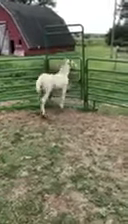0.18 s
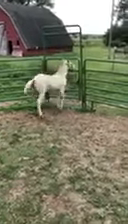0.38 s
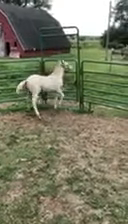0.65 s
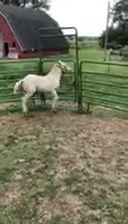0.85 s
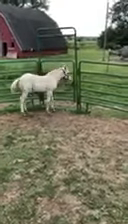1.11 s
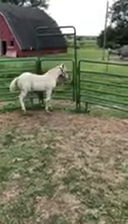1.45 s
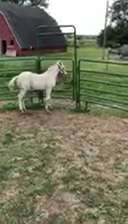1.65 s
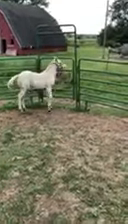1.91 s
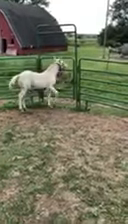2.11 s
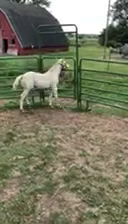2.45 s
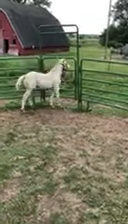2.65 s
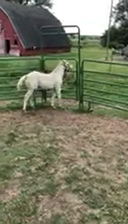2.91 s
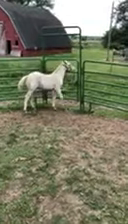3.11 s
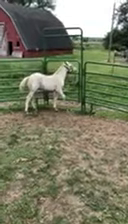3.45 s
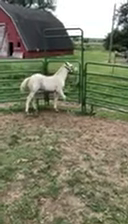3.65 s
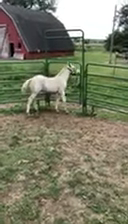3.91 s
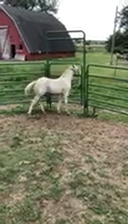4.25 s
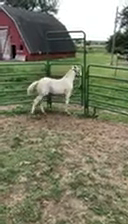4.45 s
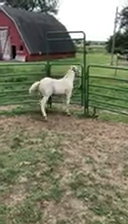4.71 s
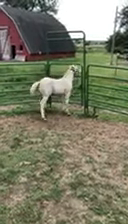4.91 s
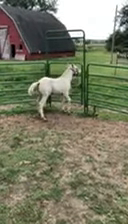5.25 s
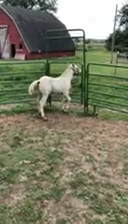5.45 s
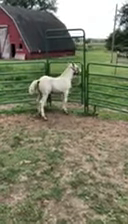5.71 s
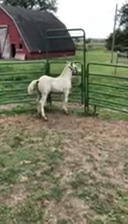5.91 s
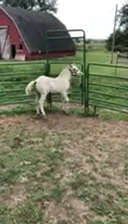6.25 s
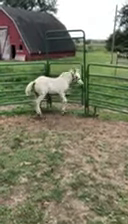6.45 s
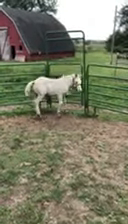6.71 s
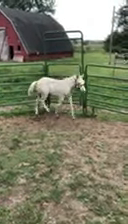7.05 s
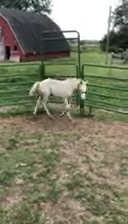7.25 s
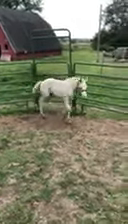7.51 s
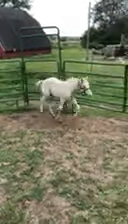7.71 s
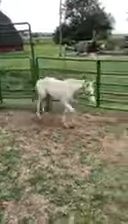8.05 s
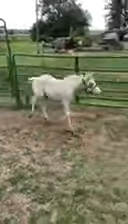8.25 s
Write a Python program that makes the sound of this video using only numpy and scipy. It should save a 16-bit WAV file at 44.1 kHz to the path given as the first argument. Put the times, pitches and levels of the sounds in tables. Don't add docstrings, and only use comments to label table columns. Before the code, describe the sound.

A farmyard outdoors, microphone some metres from a steel pipe corral. Crickets chirr throughout in rapid falling pulses with a thin high insect hiss, over low, gusting wind and distant traffic rumble. At 0 s a hard clank is already ringing, bright and hollow, fading over about a second; a soft hoof step comes at 0.2 and faint rail nudges until 0.9, with dry grass snaps. At 2.2 a second sharp clank with a short shake, chain links tinkling until 3.0. At 3.8 a light knock, then a strong clank at 4.03. From 4.5 to 5.8 the loose gate bounces and rattles, chain and latch chattering, strongest at 4.7 and 5.0. At 5.9 a last clear clank rings, with duller shudders and taps thinning until 7.6. From 7.7 hooves thud on dirt, heaviest near 8.0, with a crisp grass snap at 8.1 and a final step at 8.3.

```python
import sys
import numpy as np
from scipy import signal
from scipy.fft import rfft, irfft, next_fast_len
from scipy.io import wavfile
from scipy.ndimage import uniform_filter1d, minimum_filter1d, map_coordinates

SR = 44100
rng = np.random.default_rng(int(sys.argv[2]) if len(sys.argv) > 2 else 0)


def gain_from_db(level_db):
    decades = np.asarray(level_db, float) / 20
    return 10 ** decades


def inscribe(sig):
    pcm = np.round(np.clip(np.atleast_2d(sig).T, -1, 1) * 32767)
    wavfile.write(sys.argv[1], SR, pcm.astype(np.int16))


N = 369099

# frequency in Hz, level in dB per Hz.
WASH_SPECTRUM = [(15, -43.5), (25, -13), (70, -2), (346, -12), (737, -15.5), (1860, -20), (2020, -19.5),
                 (2550, -21.5), (3800, -23.5), (4940, -39.5), (8360, -120)]
RUMBLE_SPECTRUM = [(20, -16.0), (60, -1.0), (120, 1.0), (250, -26.0), (400, -48.0)]
# peak time in seconds, rise over the lull in dB.
GUST_PEAKS = [
    (0, 4),
    (1.9, 5.5),
    (3.7, 2),
    (4.7, 10),
    (5.9, 9),
    (6.5, 5),
    (7.6, 11),
    (8.3, 6),
]
LULL_DB, GUST_S = -80, 0.52

# pulses per second, start pitch in Hz, level in dB.
NEAR_CRICKETS = [(22.33, 5300, 0.5), (23.8, 5000, 0), (30.65, 4750, -7), (21.93, 5150, -4),
                 (21.02, 4800, -1), (25.4, 4600, -6.5), (27.76, 5350, -3.5)]
# frequency in Hz, level in dB per Hz.
CHORUS_SPECTRUM = [(3500, -27), (4000, -4), (4500, 7.5), (5000, 8), (5300, -3.5), (5600, -71)]
HISS_SPECTRUM = [(5000, -55.5), (6300, -33.5), (6800, -9.5), (7400, -6.5), (7650, 6), (8200, 5),
                 (8950, 1.5), (9200, -14), (9800, -20.5), (10300, -22), (11000, -58)]
# start in seconds, level in dB, pitch in Hz, length in seconds, sag in Hz per s.
INSECT_NOTES = [
    (7.259, -51.5, 6450, 0.021, 1300),
    (6.15, -63, 7960, 2.4, -0.5),
    (3.3, -67, 8066, 0.83, 0),
]
CRICKET_DB, FAR_CRICKET_DB, HISS_DB = -62, -63.5, -59

# time in seconds, peak in dB, grit in dB, ground pitch in Hz.
HOOF_FALLS = [
    (0.197, -48, -1.5, 116),
    (4.205, -51.5, -8, 92),
    (4.347, -53, -4, 106),
    (4.652, -46.5, -19, 96),
    (7.725, -45, -9, 107),
    (7.837, -59, 4.5, 119),
    (7.968, -40, -10, 91.6),
    (7.995, -50, 3, 102),
    (8.02, -51, -12, 100),
    (8.304, -44, -3, 86),
]
# time in seconds, peak in dB, length in seconds.
GRASS_SNAPS = [(0.799, -45.5, 0.038), (0.831, -43, 0.0045), (0.834, -46.5, 0.044), (1.248, -41.5, 0.016),
               (1.723, -48, 0.013), (7.392, -46.5, 0.019), (7.696, -40.5, 0.029), (7.728, -44.5, 0.019),
               (7.987, -45.5, 0.031), (8.136, -31.5, 0.0076), (8.143, -40, 0.024), (8.297, -53, 0.021)]
# frequency in Hz, level in dB per Hz.
GRIT_SPECTRUM = [(200, 1.0), (500, -4.0), (1500, -7.5), (3200, -10.0), (4500, -18.0), (9000, -25.5)]
SNAP_SPECTRUM = [(2000, -32), (3000, -26), (5000, -30), (6400, -27.5), (7600, -5), (8190, 3.5), (9500, -15),
                 (10300, -48)]
THUD_T60_S, THUD_SHORTENS = 0.081, 3.3

# frequency in Hz, t60 in seconds.
YARD_T60 = [(300, 1), (2000, 0.64), (9000, 0.08)]

# mode frequency in Hz, level in dB.
FRAME_MODES = [(250, -19.5), (400, -12.5), (800, -2), (1200, -2), (1600, 1.5), (1900, -8), (2600, -8),
               (4000, -26.5)]
CHAIN_MODES = [(1200, -16.5), (2000, -8), (2800, -4.5), (3600, -4), (4500, -6.5), (5500, -17), (6500, -20),
               (8500, -11.5), (10000, -33)]
LINK_MODES = [(6500, -36), (7500, -2), (8000, 13), (8800, 8.5), (9600, -7), (10200, -33)]
# time in seconds, peak in dB, bright part in dB.
GATE_BOUNCES = [(4.56, -41.5, 17.5), (4.572, -45, 11), (4.581, -41.5, 8), (4.624, -41, 3),
                (4.704, -32.5, -4), (4.727, -37, -2), (4.735, -42, -9), (4.751, -48, -8),
                (4.824, -40.5, -11), (4.845, -37, 6), (4.884, -40, -11), (4.997, -32.5, -4),
                (5.039, -41.5, -15), (5.134, -40, -20), (5.289, -51.5, -2), (5.375, -46.5, -4),
                (5.562, -44.5, -28), (5.646, -43.5, -15), (5.702, -39, -27), (5.833, -47.5, -28),
                (6.392, -46, -16), (6.74, -63, 1), (7.109, -60, -19), (7.15, -48, -23), (7.341, -47.5, -3),
                (5.423, -60, -8), (5.617, -54, -15), (6.518, -55, -15.5), (6.957, -65, -12),
                (7.228, -60, -9), (7.433, -59, -4), (7.476, -60, -10)]
GATE_SHUDDERS = [(4.623, -39, -4.5), (4.809, -38, -17), (4.866, -43.5, -12), (5.529, -47.5, -20),
                 (6.125, -42, -39), (6.281, -42.5, -14), (6.483, -53, -28), (6.582, -50.5, -11),
                 (6.692, -50, -11), (7.561, -62.5, -2), (7.59, -63, 3.5)]
BOUNCE_T60_S, SHUDDER_T60_S = .17, .4
# time in seconds, level in dB.
LINK_TINKLES = [
    (2.263, -47),
    (2.917, -51),
    (2.95, -51.5),
    (2.999, -56),
    (6.068, -55.5),
]
SMALL_LINK_TINKLES = [
    (2.423, -45.5),
    (2.433, -49),
]
LINK_T60_S, SMALL_LINK_T60_S = 0.64, 0.29
# start in seconds, hold in seconds, level in dB, bright part in dB.
PANEL_SHAKES = [
    (2.23, 0.21, -58, 10),
    (4.516, 0.51, -45.5, -6),
    (5.479, 0.22, -59, -8),
    (6.048, 0.64, -58, -17),
    (7.09, 0.96, -67.5, -13),
]
SHAKE_RISE_S, SHAKE_FALL_DB_PER_S = 0.033, 53
GRIND_BRIGHT_TOP = [(5500, -35)]

# frequency in Hz, level in dB, t60 in seconds.
LATCH_MODES = [(786, -9.5, 0.074), (946, -16, 0.14), (1287, -9.5, 0.18), (1540, 2, 0.058),
               (1670, -2, 0.085), (2235, -12, 0.15), (2640, -11, 0.075), (3090, -12, 0.044),
               (3680, -11.5, 0.1), (3950, -13, 0.071), (4800, -13, .05), (6300, -24.5, 0.14)]
# time in seconds, level in dB, tilt in dB per octave.
LATCH_TAPS = [(4.038, -58, 14), (4.705, -40, 7), (4.8457, -45, 2), (4.868, -41, 1), (4.997, -45, 3.5),
              (5.136, -44.5, -9), (5.147, -50, -4), (5.157, -51, -7), (5.53, -54, -3), (5.564, -58, -6),
              (5.704, -45, -8.5), (5.738, -54, -8), (5.837, -67, -2), (6.127, -50, -6), (6.218, -51.5, -8),
              (6.264, -50, -7), (6.482, -59, -3), (6.582, -56, -3), (6.692, -51, -5), (6.739, -53.5, -3),
              (7.11, -56, -2), (7.148, -57.5, -5), (7.339, -49.5, -1), (7.485, -63, 0)]
# frequency in Hz, level in dB, t60 in seconds.
LOOSE_RAIL_MODES = [(948, -5.5, 0.52), (1170, -8.5, 0.36), (1360, -11, 0.4), (1440, -11, 0.43),
                    (1715, -1.5, 0.82), (1845, -1.5, 0.7), (2260, 1.5, 0.98), (2494, -9, 0.66),
                    (2602, -10, 0.69), (2819, -14, 0.76), (2960, -14.5, 0.79), (3250, -14, 0.23),
                    (3640, -16, .4)]
SAG_RAIL_MODES = [(1740, -2, .9), (1760, 0, 1.9), (1846, -6, .9), (1880, -8, 1), (2013, -8, .9),
                  (2446, -10, .6), (2820, -4, 0.6), (3540, -5, .4), (4057, -10, .4)]
FOOT_RAIL_MODES = [(1190, -8, 1), (1536, -3, .8), (1704, 0.5, 1.6), (1844, -9, 1.6)]
# time in seconds, level in dB, tilt in dB per octave.
RAIL_NUDGES = [
    (.333, -58, -1),
    (.61, -61.5, -4),
    (.632, -60, 2.5),
    (.764, -70, 8),
    (2.72, -67, 1),
    (3.818, -65, -13),
    (5.929, -61, -11),
]
RAIL_PRESSES = [
    (3.821, -59, 3),
]
RAIL_RUBS = [
    (6.28, -57.5, -3),
    (6.4, -58, 2),
]

# t60 in seconds, level in dB struck at each of four spots.
PANEL_MODES = [(0.5, -57, -57, -63, -55), (0.5, -54, -51, -60, -56), (1.8, -48, -46, -62, -61),
               (.8, -47, -44, -56, -74), (1.5, -48, -51, -59, -53), (4.8, -63, -67, -60, -51),
               (1.45, -39.5, -50, -60, -60), (.9, -60, -44, -62, -49), (2.4, -56, -55, -50, -48),
               (1.03, -58, -51, -57, -57), (0.95, -54, -44, -60, -52), (1.15, -53, -54, -54, -50),
               (1.15, -42.5, -43.5, -52.5, -56), (1.1, -48, -43, -62, -52.5),
                  (2.17, -57.5, -54, -66, -64), (0.73, -48, -51, -59.5, -64), (0.7, -55, -49, -51, -63),
                  (0.81, -48.5, -48, -52, -63), (0.65, -49.5, -40, -64, -52), (0.71, -62, -49, -65, -55),
                  (0.49, -54, -37, -55, -44), (0.9, -86, -58, -62, -75), (1.1, -54.5, -45.5, -66, -72),
                  (0.51, -62, -42.5, -65, -55),
               (0.26, -53, -71, -59, -72), (0.48, -57, -42, -80.5, -51), (0.45, -85, -44, -56, -64),
              (0.48, -48, -28, -49, -45.5), (0.52, -49.5, -44, -72, -79), (0.6, -55, -56, -73, -55),
               (0.3, -56, -55, -66, -39.5), (0.24, -43, -42, -73, -59), (0.29, -77, -51, -65, -50),
                 (0.85, -56, -44, -63, -43.5), (0.67, -50, -43, -67, -60), (0.56, -41.5, -39, -68, -54),
                 (0.3, -60, -46, -42.5, -59), (0.49, -83, -42, -46, -58), (0.59, -76, -34.5, -48, -58),
                 (0.6, -59, -36, -43.5, -54.5), (0.62, -51, -41, -54, -53), (0.56, -64, -44, -51, -43),
               (0.72, -50.5, -43, -59, -42), (0.46, -39.5, -36, -57, -37.5), (0.49, -58, -47, -56, -70),
               (0.31, -60, -42, -45, -78), (0.4, -57, -34, -51, -60), (0.63, -51, -39, -49.5, -54),
               (0.39, -44, -46.5, -52, -59), (0.73, -67, -49.5, -72, -81),
               (0.76, -79, -57, -62, -60), (0.19, -48, -51, -46, -48), (0.36, -56.5, -55, -47, -74),
             (1.5, -61.5, -57, -63, -60), (1.4, -74, -69.5, -70, -62), (0.56, -79, -70, -72, -75),
             (1.7, -70, -59.5, -68, -76), (1.41, -74, -75, -61.5, -61), (5, -69, -59, -73, -79),
             (1.6, -63, -62, -68, -65),
               (1.5, -52, -52, -67, -74), (1.8, -54, -50.5, -73, -76), (0.64, -48, -73, -70, -78),
                    (0.81, -52, -60, -66, -75), (0.33, -70, -60, -70, -45.5),
                    (0.76, -53.5, -39, -56, -54.5), (0.64, -71, -49.5, -61, -50), (.6, -74, -60, -71, -53),
                    (0.76, -70, -42, -71, -45), (.7, -49, -40, -59, -65), (.5, -43, -61, -65, -70),
                    (.5, -43, -60, -70, -67), (0.46, -60, -52, -43.5, -62), (0.54, -65, -51, -58, -74)]
PANEL_MODE_HZ = [
    [949, 1359, 1711.5, 1729, 1756.2, 1758.5, 1775, 1843, 1865, 1890, 2013, 2032],
    [2260, 2390, 2410, 2552, 2584, 2608, 2748, 2853, 2884, 3035, 3203, 3232],
    [3338, 3381, 3494, 3588, 4007, 4042],
    [4091, 4118, 4175, 4837, 4880, 4949, 5002, 5095, 5110, 5214, 5238, 5335],
    [5374, 5551, 5747, 5915, 5992, 6015, 6266, 6325],
    [7157, 7562, 7932, 7960, 8066, 8176, 8460, 8481, 8613, 8808],
    [1694, 1986, 2244, 2622, 4074, 4785, 4813, 4860, 4897, 4927, 5021, 5358, 5542, 5767],
]
# time in seconds, ring in dB, crash in dB, tilt in dB per octave.
SPOT_BLOWS = [
    [(-.004, 1, -40, 2), (.435, -36, -67, 0), (.915, -34, -69, -5), (0.335, -40, -68, -18),
     (.61, -33, -67, 0)],
    [(2.2175, 2, -33.5, -1), (2.262, -55, -47.5, 5), (2.718, -26, -58.5, -5.5), (4.562, -23, -40.5, 1),
     (4.705, -19, -45.5, -8)],
    [(3.815, -25, -55.5, -2), (3.826, -10, -53.5, -6), (4.028, -19, -52, 1.5), (4.033, 1, -43, 1.5),
     (4.53, -18, -59, -6)],
    [(5.916, 1, -41.5, 1.5), (8.1, -43, -89, 6)],
]
# frequency in Hz, level in dB per Hz.
CROWD_SPECTRUM = [(210, -70), (350, -28.5), (926, -22.5), (1230, -17.5), (1750, -11), (2900, -4),
                  (3490, -4), (4300, -6), (5110, -28.5), (10200, -39), (13200, -59), (22000, -120)]
CRACK_SPECTRUM = [(400, -39.0), (2000, -2.5), (5000, -1.0), (6700, -6.5), (8500, -0.5), (10500, -17.0)]
SHIMMER_SPECTRUM = [(3500, -15.0), (4200, -19.0), (5000, -3.0), (5500, -16.5), (7000, -28.5),
                    (8000, -27.0), (9500, -6.5), (11000, -60)]
HARD_RISE_S, SOFT_RISE_S, SOFT_BELOW_DB, SOFT_SPAN_DB = .0007, .016, -53, 3
SOFT_CROWD_DB, CROWD_T60_S = -3, .3
SHIMMER_DB, SHIMMER_T60_S, SHIMMER_RISE_S = -20, 1.1, .05

# frequency in Hz, level in dB per bin.
SPECTRUM_FLOOR = [(100, -71), (1800, -38.5), (3500, -43.5), (5300, -57), (5500, -38), (6300, -58),
                  (6450, -56.5), (11000, -47.5)]
# centre in Hz, half width in Hz, extra masking in dB.
MASKED_BANDS = [(2140, 65, 4), (3100, 60, 9), (3400, 50, 9), (3800, 110, 10), (4330, 130, 11)]
TOP_HZ = 10250


def unit(x):
    return x / np.sqrt(np.mean(x ** 2) + 1e-20)


def along(points, hz):
    f, v = np.transpose(points)
    return np.interp(np.log(hz + 1), np.log(f + 1), v)


def wobble(rate_hz):
    at = np.arange(0, N + 32, 32)
    knots = rng.standard_normal(int(N * rate_hz / SR) + 4)
    return np.interp(np.arange(N), at, map_coordinates(knots, [at * rate_hz / SR]))


def filtered(x, response):
    m = next_fast_len(N + SR // 2)
    return irfft(rfft(x, m) * response(np.fft.rfftfreq(m, 1 / SR)), m)[:N]


def noise(spectrum):
    return unit(filtered(rng.standard_normal(N), lambda hz: gain_from_db(along(spectrum, hz))))


def add(track, start_s, sound):
    i = round(start_s * SR)
    part = track[max(i, 0):max(i + len(sound), 0)]
    part += sound[max(-i, 0):][:len(part)]


def fall(t, t60_s, rise_s):
    return (1 - np.exp(-t / rise_s)) * gain_from_db(-60 * t / t60_s)


def contact_s(crash_db):
    hardness = np.exp((crash_db - SOFT_BELOW_DB) / SOFT_SPAN_DB)
    return HARD_RISE_S + (SOFT_RISE_S - HARD_RISE_S) / (3 + hardness)


def clatter(spectrum, lo_hz, hi_hz, contacts, count, rise_s=0.00056):
    out, t = np.zeros(N), np.arange(SR // 3) / SR
    hz = np.geomspace(lo_hz, hi_hz, count) * (1 + .008 * rng.standard_normal(count))
    tones = np.sin(2 * np.pi * (hz[:, None] * t + rng.random((count, 1))))
    chance = rng.standard_normal((len(contacts), count + 8))
    rises_s = np.broadcast_to(rise_s, len(contacts))
    for (s, db, t60_s), luck, onset_s in zip(contacts, chance, rises_s):
        ring = unit(gain_from_db(along(spectrum, hz) + 3.53 * luck[:count]) @ tones)
        decay = fall(t, 0.44 * t60_s, onset_s) + .24 * fall(t, t60_s, onset_s)
        add(out, s, gain_from_db(db) * ring * decay)
        rebound = ring[99:4099] * fall(t[:4000], .15 * t60_s, .6 * onset_s)
        for late, size in luck[count:].reshape(-1, 2):
            add(out, s + .018 * abs(late), gain_from_db(db - 8 + 2 * size) * rebound)
    return out


def struck(modes, hits, rise_s, scatter_db):
    out, t = np.zeros(N), np.arange(SR) / SR
    hz, level_db, t60_s = np.transpose(modes)[:, :, None]
    tones = np.sin(2 * np.pi * hz * t) * fall(t, t60_s, rise_s)
    chance = rng.standard_normal((len(hits), len(modes), 1))
    for (s, db, tilt), luck in zip(hits, chance):
        gain_db = db + level_db + tilt * np.log2(hz / 1500) + scatter_db * luck
        add(out, s, (gain_from_db(gain_db) * tones).sum(axis=0))
    return out


def air():
    t = np.arange(N) / SR
    level_db = LULL_DB + sum(db * np.exp(-((t - s) / GUST_S) ** 2) for s, db in GUST_PEAKS)
    lumps_db = level_db + 2.5 * wobble(5) + 3.2 * wobble(13)
    return gain_from_db(lumps_db) * noise(RUMBLE_SPECTRUM) + gain_from_db(-66.5) * noise(WASH_SPECTRUM)


def cricket(pulse_hz, top_hz):
    cycle = np.cumsum(pulse_hz * (1 + .03 * wobble(2))) / SR + rng.random()
    stroke = cycle % 1 / 0.45
    hz = top_hz * (1 - .12 * stroke + .01 * wobble(11))
    group_cycle = np.cumsum(3.2 + 0.35 * wobble(1.25)) / SR + 0.36 * rng.random()
    group = np.cos(2 * np.pi * group_cycle)
    level_db = 4 * group + 4 * wobble(1.3) + 2.5 * wobble(5) + 3 * wobble(60)
    swell = np.sin(np.pi * np.clip(stroke, 0, 1)) * gain_from_db(level_db)
    return unit(swell * np.sin(2 * np.pi * np.cumsum(hz) / SR))


def insects():
    near = unit(sum(gain_from_db(db) * cricket(pulse_hz, hz) for pulse_hz, hz, db in NEAR_CRICKETS))
    out = gain_from_db(CRICKET_DB) * near + gain_from_db(FAR_CRICKET_DB) * noise(CHORUS_SPECTRUM)
    out = out + gain_from_db(HISS_DB + 1.63 * wobble(9.6) + 1.3 * wobble(25)) * noise(HISS_SPECTRUM)
    for s, db, hz, length_s, sag in INSECT_NOTES:
        t = np.arange(int(length_s * SR)) / SR
        swell = np.sin(np.pi * t / length_s) ** 0.55
        add(out, s, gain_from_db(db) * swell * np.sin(2 * np.pi * t * (hz - .5 * sag * t)))
    return out


def ground():
    thud, grit, snap = np.zeros((3, N))
    t = np.arange(SR // 4) / SR
    for s, db, grit_db, hz in HOOF_FALLS:
        t60_s = THUD_T60_S * (120 / hz) ** THUD_SHORTENS
        turns = np.cumsum(hz * (1 + 2.3 * np.exp(-t / 0.0058))) / SR
        add(thud, s + 0.00715, gain_from_db(db) * np.sin(2 * np.pi * turns) * fall(t, t60_s, 0.0019))
        add(grit, s, gain_from_db(db + grit_db + 1.5) * fall(t, .065, .0015))
    for s, db, length_s in GRASS_SNAPS:
        burst = (1 - np.exp(-t / 0.00084)) * np.exp(-(t / length_s) ** 4)
        add(snap, s, gain_from_db(db - 7.5) * burst)
    return thud + grit * noise(GRIT_SPECTRUM) + snap * noise(SNAP_SPECTRUM)


def yard(x):
    hz, _, z = signal.stft(rng.standard_normal(SR // 2), SR, nperseg=256)
    t = np.arange(z.shape[1]) * 128 / SR
    tail = signal.istft(z * gain_from_db(-60 * t / along(YARD_T60, hz)[:, None]), SR, nperseg=256)[1]
    return signal.fftconvolve(np.pad(x, (700, 0)), tail / np.linalg.norm(tail))[:N]


def scrape():
    dull, bright = np.zeros((2, N))
    t = np.arange(SR * 3 // 2) / SR
    for s, hold_s, db, bright_db in PANEL_SHAKES:
        level_db = db - 9 - SHAKE_FALL_DB_PER_S * np.clip(t - hold_s, 0, None)
        shake = np.clip(t / SHAKE_RISE_S, 0, 1) ** 2 * gain_from_db(level_db)
        add(dull, s, shake)
        add(bright, s, shake * gain_from_db(bright_db))
    grains = unit(gain_from_db(6 * wobble(150) + 2 * wobble(22)))
    return grains * (dull * noise(FRAME_MODES) + bright * noise(CHAIN_MODES[:5] + GRIND_BRIGHT_TOP))


def gate():
    bounces = [(*row, BOUNCE_T60_S) for row in GATE_BOUNCES]
    shudders = [(*row, SHUDDER_T60_S) for row in GATE_SHUDDERS]
    rattles = sorted(bounces + shudders)
    frame_hits = [(s, db - 8.0, t60_s) for s, db, _, t60_s in rattles]
    chain_hits = [(s, db + bright_db - 5, 0.7 * t60_s) for s, db, bright_db, t60_s in rattles]
    link_hits = [(*row, LINK_T60_S) for row in LINK_TINKLES]
    small_hits = [(*row, SMALL_LINK_T60_S) for row in SMALL_LINK_TINKLES]
    frame = clatter(FRAME_MODES, 249.7, 4000, frame_hits, count=90, rise_s=0.0023)
    chain = clatter(CHAIN_MODES, 1200, 10000, chain_hits, count=90, rise_s=.002)
    links = clatter(LINK_MODES, 6500, 10100, link_hits, count=30)
    small_links = clatter(LINK_MODES, 8300, 10100, small_hits, count=30)
    return frame + chain + links + small_links


def latch():
    return struck(LATCH_MODES, LATCH_TAPS, rise_s=0.002, scatter_db=2.5)


def loose_rails():
    nudged = struck(LOOSE_RAIL_MODES, RAIL_NUDGES, rise_s=0.0032, scatter_db=5)
    pressed = struck(SAG_RAIL_MODES, RAIL_PRESSES, rise_s=.008, scatter_db=1.5)
    rubbed = struck(FOOT_RAIL_MODES, RAIL_RUBS, rise_s=.04, scatter_db=1.5)
    return nudged + pressed + rubbed


def shimmer():
    level, t = np.zeros(N), np.arange(SR) / SR
    for s, _, crash_db, _ in sum(SPOT_BLOWS, []):
        add(level, s, gain_from_db(crash_db + SHIMMER_DB) * fall(t, SHIMMER_T60_S, SHIMMER_RISE_S))
    return level * noise(SHIMMER_SPECTRUM)


def crowd():
    hits, rises_s = [], []
    for s, _, crash_db, _ in sum(SPOT_BLOWS, []):
        rise_s = contact_s(crash_db)
        hits.append((s, crash_db + 4.2 + SOFT_CROWD_DB * rise_s / SOFT_RISE_S, CROWD_T60_S))
        rises_s.append(rise_s / 2)
    return clatter(CROWD_SPECTRUM, 400, 10000, hits, count=130, rise_s=rises_s)


def panels():
    ring, crack = np.zeros((2, N))
    t = np.arange(2 * SR) / SR
    hz = np.concatenate(PANEL_MODE_HZ)[:, None]
    pipes = (PANEL_MODES)
    t60_s, *spots = np.transpose(pipes)[:, :, None]
    modes = np.sin(2 * np.pi * hz * t + (hz / 300) ** 2) * np.exp(-np.log(1000) * t / t60_s)
    beat_hz = 3 + 12 * rng.random(hz.shape)
    beat = 1 + 0.21 * np.cos(2 * np.pi * beat_hz * t[::50]) * (hz > 1900)
    modes *= np.repeat(beat, 50, axis=1)
    for spot_db, blows in zip(spots, SPOT_BLOWS):
        for s, ring_db, crash_db, tilt in blows:
            rise_s = contact_s(crash_db)
            gain_db = spot_db + ring_db + tilt * np.log2(hz / 2000)
            mix = (gain_from_db(gain_db).T @ modes)[0]
            add(ring, s, mix * (1 - np.exp(-t / rise_s)))
            add(crack, s, gain_from_db(crash_db + 2.4 * tilt) * fall(t[:SR // 4], 0.25, rise_s / 3))
    return ring + crowd(), crack * noise(CRACK_SPECTRUM)


def scene():
    background = air() + insects() + ground()
    ring, crack = panels()
    knocks = crack + gate() + scrape()
    ring = ring + loose_rails() + latch()
    echoes = gain_from_db(-8) * yard(knocks) + gain_from_db(-19) * yard(ring)
    return (background + shimmer() + knocks + ring + echoes)[None]


def thinned(x):
    limited = filtered(x, lambda f: 1 / (1 + (f / TOP_HZ) ** 80))
    hz, _, z = signal.stft(limited, SR, "cosine", 2048)
    power = uniform_filter1d(np.abs(z * 724) ** 2, size=5, axis=0)
    level_db = 10 * np.log10(np.abs(power) + 1e-12)
    masker_db = -minimum_filter1d(-level_db, size=25, axis=0, origin=8) - 16.5
    extra_db = sum(db * (np.abs(hz - mid_hz) < half_hz) for mid_hz, half_hz, db in MASKED_BANDS)
    masker_db += extra_db[:, None]
    masker_db = np.where(np.abs(hz[:, None] - 4200) < 2600, masker_db, -120)
    margin_db = level_db - np.maximum(masker_db, along(SPECTRUM_FLOOR, hz)[:, None])
    kept = 1 / (1 + np.exp(-np.clip(margin_db, -40, 40)))
    return signal.istft(z * kept, SR, "cosine", 2048)[1][None, :N]


def band_limit(x):
    return signal.sosfilt(signal.butter(12, 10340, fs=SR, output="sos"), x)


def record(dry):
    mix = thinned(dry[0])
    return band_limit(mix)


dry = scene()
out = record(dry)
inscribe(out)
```